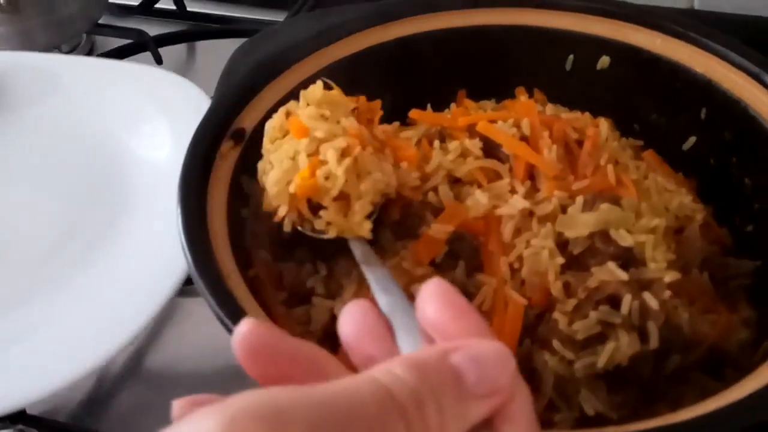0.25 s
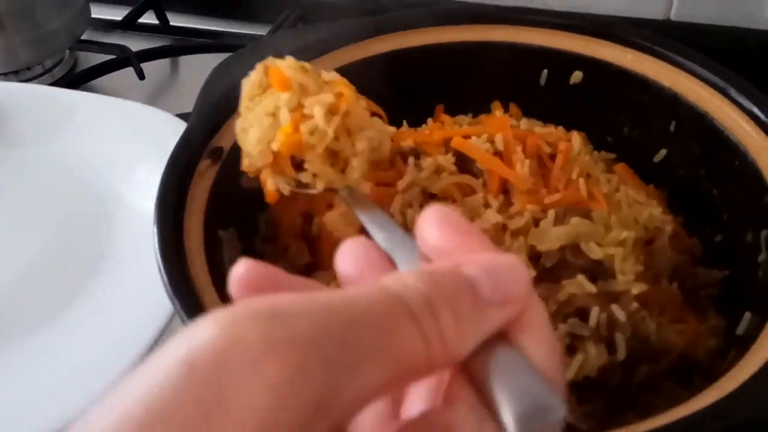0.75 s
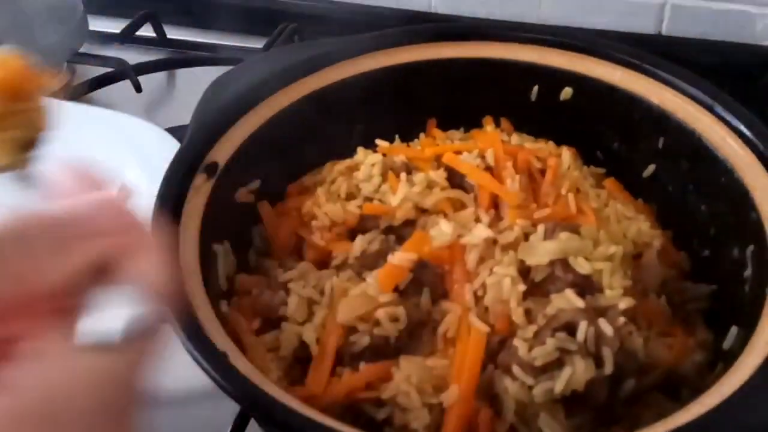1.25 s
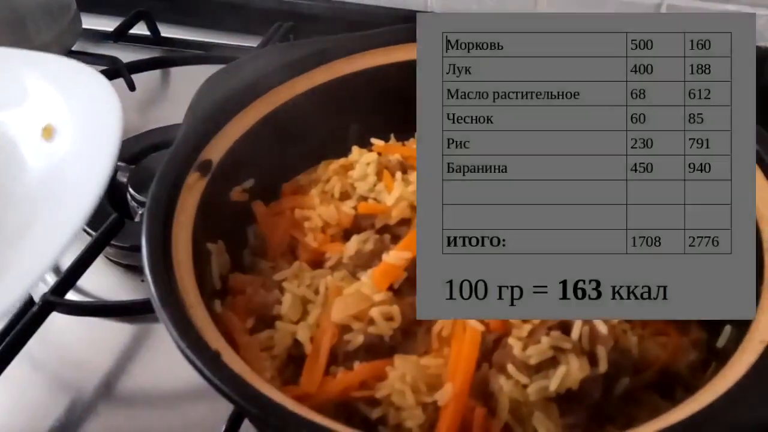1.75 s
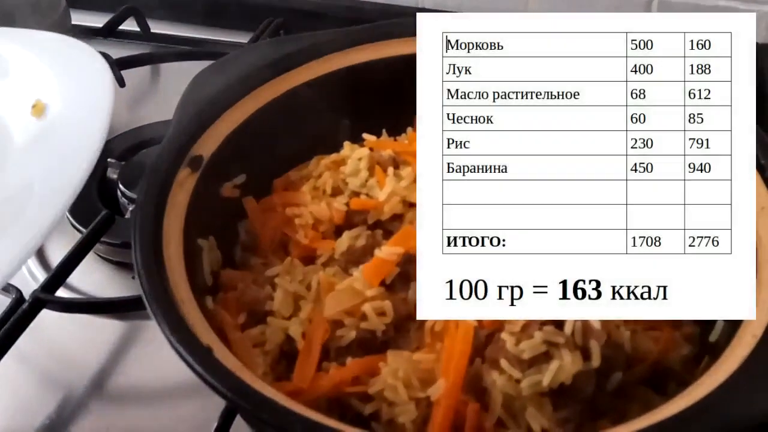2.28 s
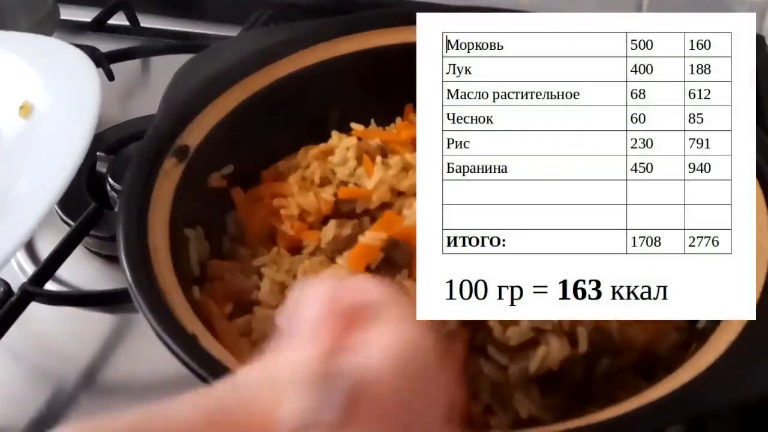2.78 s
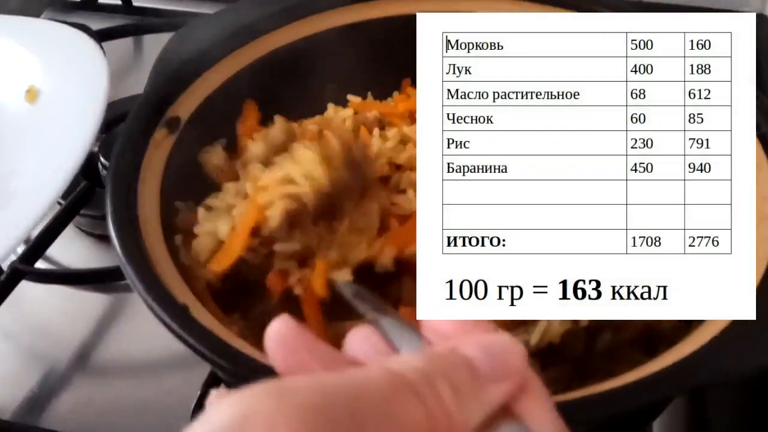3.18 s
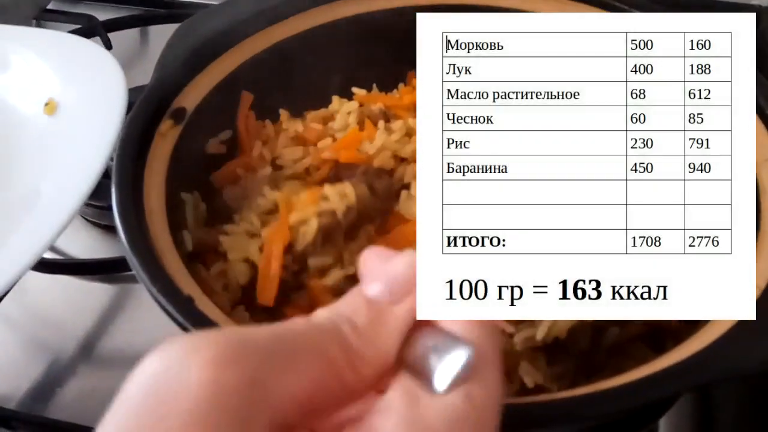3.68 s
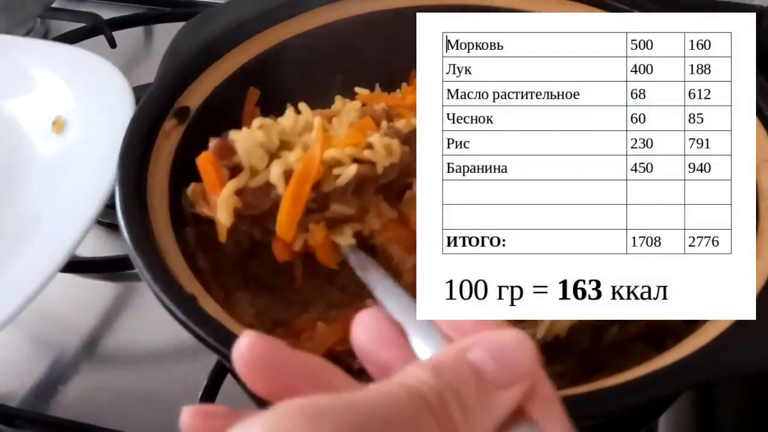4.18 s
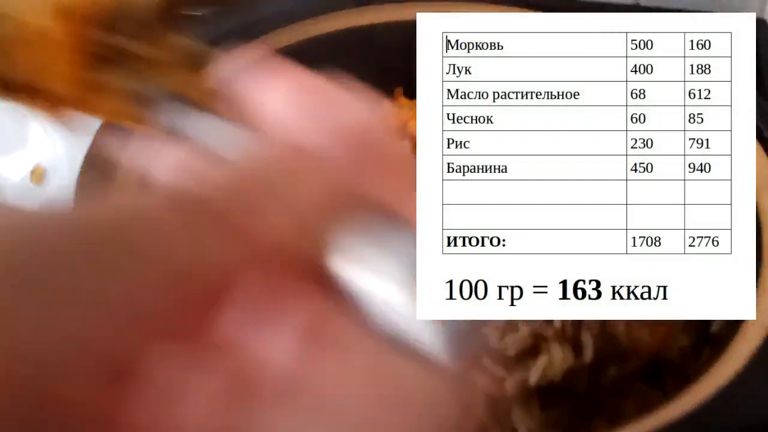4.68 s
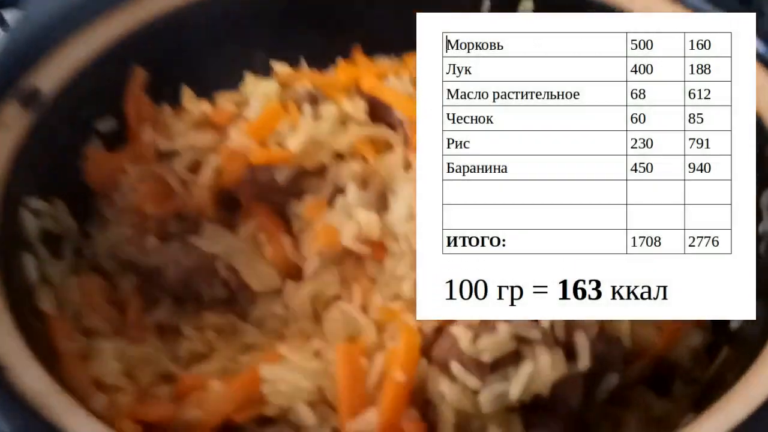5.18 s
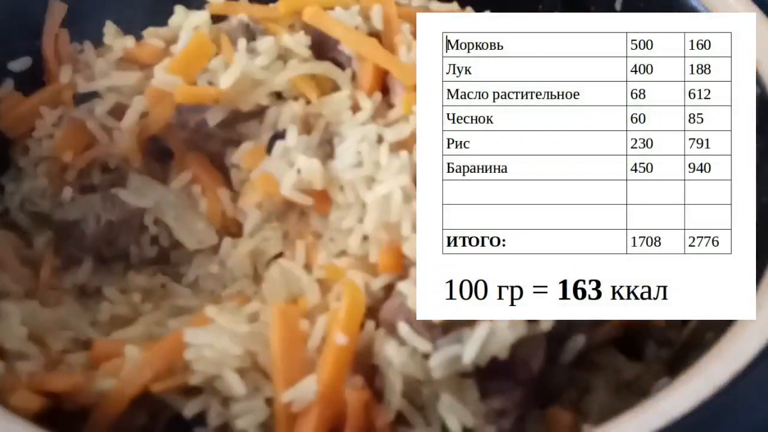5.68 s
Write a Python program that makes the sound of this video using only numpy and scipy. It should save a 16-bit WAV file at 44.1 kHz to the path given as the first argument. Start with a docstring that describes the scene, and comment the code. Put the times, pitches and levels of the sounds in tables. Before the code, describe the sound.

A metal spoon knocks a glazed ceramic pot three times, with rice scrapes, tiny ticks and a faint wall clock in a small kitchen.

```python
"""A small hard-walled kitchen: close by, a metal spoon serves rice from a glazed ceramic pot.
Three knocks ring the pot as a bank of decaying modes; the stove top under it swells in low modes.
Between them, clumps of tiny clicks make scrapes, noise puffs make ticks, and resonators squeak and ring a plate.
Further off a wall clock rattles its case about once a second, over shaped noise for room hiss, drones and hum.
The microphone hears the room's reverberation too; both channels are nearly alike."""
import sys
import numpy as np
from scipy import signal
from scipy.fft import rfft, irfft
from scipy.io import wavfile

SR = 44100
rng = np.random.default_rng(int(sys.argv[2]) if len(sys.argv) > 2 else 0)


def log_audio(samples):
    """Write samples as a 16-bit WAV file to the path given in sys.argv[1]."""
    # one column per channel
    frames = np.atleast_2d(samples).T
    # limit to full scale, then quantise
    limited = np.clip(frames, -1, 1)
    pcm = np.round(limited * 32767).astype(np.int16)
    wavfile.write(sys.argv[1], SR, pcm)


N = 261954   # length in samples

# The pot's modes. Each entry: frequency in Hz.
POT_MODE_HZ = [495, 587, 624, 684, 822, 915, 1055, 1152, 1281, 1346, 1597, 1698, 1815, 1866, 1943, 1986,
               2480, 2965, 3080, 3149, 3935, 4390, 4640, 4805, 5110, 5510, 6480, 7900, 8480, 9690]
# How those modes answer. Each row: t60 in s, then strength in dB when struck at the first, second and third spot.
POT_SPOTS = [(0.15, -26, -43.5, -26.5), (0.28, -25, -34, -22.5), (0.45, -18, -31.5, -27),
             (0.11, -17, -30, -27.5), (0.2, -27, -29, -29.5), (0.2, -25.5, -32, -39),
             (0.199, -30.5, -28.5, -28.5), (0.17, -29, -39.5, -26.5), (0.2, -37, -47.5, -26.5),
             (0.2, -28.5, -52.5, -32.5), (0.25, -11, -17.5, -12), (0.29, -30.5, -16.5, -17),
             (0.2, -31.5, -32, -20.5), (0.2, -22.5, -20.5, -17), (0.13, -26.5, -29.5, -22.5),
             (0.17, -30, -38, -19.5), (0.2, -42.5, -35.5, -34), (0.15, -23.5, -22, -17.5),
             (0.2, -31.5, -19.5, -44), (0.22, -19.5, -20, -15.5), (0.14, -40, -28, -30),
             (0.19, -45.5, -31, -49), (0.13, -37.5, -24, -47), (0.12, -31.5, -25.5, -24.5),
             (0.12, -39, -39.5, -35), (0.089, -30.5, -20, -33), (0.092, -27.5, -24.5, -30),
             (0.13, -54, -39.5, -64), (0.14, -51.5, -39, -81), (0.14, -53, -30, -46.5)]
# Noisy crack of each knock, one per spot. Each row: start in s, peak in dB, centre in Hz, width in octaves, t60 in s.
KNOCK_CRACKS = [(0.5412, -4, 1123, 3, 0.051), (3.43, -1.5, 2516, 3.86, 0.042),
                (5.465, -7, 1370, 2.8, 0.035)]
# Rice shaken against the glaze by a knock. Each row: start in s, peak in dB, centre in Hz, width in octaves, t60 in s.
RICE_SHAKES = [(.543, -32, 5200, 0.94, .15), (3.432, -9, 3500, 1.8, .3), (3.432, -22.5, 9500, 1., 0.29),
               (3.432, -29.5, 15000, .25, .14), (5.467, -34.5, 4550, .9, .12)]
# Spoon chattering on the wall after each knock. Each row: level at the knock in dB, loss in dB per s.
SPOON_CHATTER = [(-20, 200), (-21, 120), (-30, 249.5)]
# Spoon sliding on the wall struck before. Each row: time of full level in s, length held in s, level in dB.
WALL_SLIDES = [(.77, 0.093, -45), (0.988, 0.094, -63.5), (5.68, 0.044, -55.5), (5.791, 0.032, -67.5)]
ATTACK_DB_PER_S, RELEASE_DB_PER_S = 394, 253.5   # how a slide or stroke swells and fades

# Sheet-metal stove top. Each row: frequency in Hz, t60 in s, relative level in dB.
STOVE_MODES = [(129.85, 0.43, -6), (225.5, .27, 0.4), (281, 0.5, -1.5), (336, 0.52, -0.2)]
# Pushes on the stove top. Each row: start in s, level in dB of the modes under 250 Hz, level in dB of those above.
STOVE_PUSHES = [(.545, -35.5, -34.5), (.79, -50, -41.5), (3.125, -42.5, -57.5), (3.15, -44, -55),
                (3.441, -27, -34), (3.839, -34.5, -49), (5.47, -28, -54)]
# Dull noise of each push; its level is relative to the push's low modes.
THUD_DB, THUD_HZ, THUD_OCTAVES, THUD_T60_S = -7.5, 100.64, 1.2, 0.23
# The pot rocking on its grate. Each row: start in s, peak in dB.
POT_ROCKS = [(3.123, -38.5), (3.832, -32.5)]
ROCK_HZ, ROCK_OCTAVES, ROCK_T60_S = 670, 0.93, 0.12

# Strokes through the rice. Each row: time of full level in s, length held in s, rasp in dB, fine sizzle in dB.
RICE_STROKES = [(2.92, 0.07, -53.5, -59), (3.042, 0.029, -51, -58.5), (3.148, 0.069, -58, -68),
                (3.22, 0.047, -72, -57), (3.3, 0.14, -80, -69), (3.735, 0.067, -54, -56),
                (3.81, 0.016, -65, -62), (3.924, 0.041, -65, -71), (5.23, 0.029, -74, -66)]
# Colour of the rasp. Each row: frequency in Hz, relative density in dB per Hz.
RASP_SPECTRUM = [(710, -65.5), (1200, -15.5), (2090, -19), (2280, -4), (2870, -11.5), (5780, -10),
                 (8000, -35.5), (10400, -58), (17600, -120)]
# Colour of the fine sizzle. Each row: frequency in Hz, relative density in dB per Hz.
SIZZLE_SPECTRUM = [(7500, -33), (9000, -12.5), (10800, 4.5), (12500, -7), (13700, -20), (15200, 0.5),
                   (16400, -9.5)]

# Bright ticks of grains and spoon edge. Each row: start in s, peak in dB, centre in Hz.
BRIGHT_TICKS = [(0.1042, -45, 15300), (0.2295, -44, 15100), (0.7786, -37, 12700), (1.4568, -49, 15200),
                (1.735, -45.5, 11700), (2.2835, -48, 15400), (2.7696, -41, 10700), (2.8991, -37, 9150),
                (3.0415, -38, 11100), (3.1509, -43.5, 11400), (3.2177, -51, 10700), (3.268, -37, 15500),
                (3.3054, -38, 15260), (3.356, -41, 15200), (3.806, -34, 15400), (3.8718, -31, 14800),
                (4.045, -36, 14900), (4.4436, -51, 14960), (5.2178, -49.5, 10830), (5.2541, -49.5, 9810),
                (5.3981, -53, 9920), (5.4234, -51, 15400)]
TICK_OCTAVES, TICK_T60_S = 0.2, 0.031
# Duller contacts with the pot wall. Each row: start in s, peak in dB, centre in Hz, width in octaves.
WALL_TOUCHES = [(.306, -49.5, 1932, 0.92), (2.77, -44, 5530, .69), (2.902, -24, 5300, 2.74),
                (2.917, -30.5, 3334, 1.36), (3.167, -30.5, 3600, 0.61), (3.218, -36.5, 4810, 0.98),
                (3.412, -39, 6900, .29), (3.731, -24, 3220, 1.66), (3.916, -45, 3460, 1.44),
                (5.319, -51, 1700, 0.97)]
TOUCH_T60_S = 0.029

# Spoon edge squeaking on glaze. Each row: start in s, level in dB before a fixed cut, frequency in Hz, t60 in s.
GLAZE_SQUEAKS = [(1.6713, -46, 1772, 0.077), (1.7218, -45, 1760, 0.093), (1.7435, -42.5, 1808, 0.053),
                 (1.776, -41, 1810, 0.056)]
# The tap on the plate. One row: start in s, level in dB before a fixed cut.
PLATE_TAP_EVENT = [(1.794, -33)]
# The plate's modes. Each row: frequency in Hz, relative level in dB, t60 in s.
PLATE_MODES = [(1800, -6, 0.029), (2064, -3.5, 0.032), (2820, -12, .05), (3018, -5, 0.16),
               (2985, 2.5, 0.047), (3230, -6, 0.075), (5460, -8, 0.024), (5640, -13, 0.057),
               (8600, -30, 0.028), (9600, 1, 0.032), (10270, 7, 0.038), (13700, -20, .025)]

# Wall clock ticks, before the loss with distance. Each row: start in s, peak of the rattle in dB.
CLOCK_TICKS = [(0.058, -46), (1.05, -40), (2.055, -41.5), (3.046, -43), (4.073, -49), (5.046, -41.5)]
# The clock case's modes. Each row: frequency in Hz, damping in Hz (t60 in s is 0.73 over it), relative level in dB.
CLOCK_CASE_MODES = [(956, 20, -0.5), (1280, 11, -11.5), (1478, 47, -2.5), (1830, 53, -4.5), (2330, 56, 1.5),
                    (2680, 44, -3.5), (3240, 27, -7), (4230, 97, -3.5)]

# Colour of the steady room noise. Each row: frequency in Hz, relative density in dB per Hz.
AIR_SPECTRUM = [(18, -50), (30, -27.5), (128, -3.5), (167, -15.5), (201, -10), (298, -9), (409, -16),
                (547, -10.5), (835, -15.5), (1620, -22), (1840, -22.5), (4290, -23.5), (13400, -36),
                (15200, -23.5), (16500, -38)]
AIR_DB = -60.5
# Steady appliance tones. Each row: frequency in Hz, width in Hz, level in dB.
APPLIANCE_DRONES = [(200, 23, -74), (335.6, 37, -67.5), (539, 3, -72)]
# A low hum that wavers. Each row: time in s, level in dB.
HUM_LEVEL = [(0.0, -79.5), (0.58, -69.5), (0.76, -58.5), (1.3, -62.5), (1.74, -67), (2.03, -55.5),
             (2.2, -61), (2.84, -77), (3.03, -60), (3.3, -54.5), (3.49, -63.5), (3.79, -92), (3.99, -65),
             (4.43, -70), (5.03, -70.5), (5.64, -77), (5.94, -61)]
HUM_HZ, HUM_WIDTH_HZ = 136, 20

# The kitchen's reverberation time. Each row: frequency in Hz, t60 in s.
KITCHEN_T60 = [(100, 0.92), (260, .75), (700, 0.57), (1800, 0.48), (5000, 0.41), (9000, 0.3), (14000, 0.31)]
ROOM_DB = -9          # near sounds sent to the reverberation
CUTOFF_HZ = 16650     # top of the recorded band


def pot(spread=0.023, neighbour_db=-9, flutter_db=4.5):
    """Each knock strikes every mode as strongly as its spot allows; the slide after it rubs the same modes."""
    times = np.array(KNOCK_CRACKS)[:, 0]
    count = len(POT_MODE_HZ)
    slides = rng.standard_normal(N) * rubbing()
    # the blow takes a moment to spread round the wall
    lags = rng.uniform(0, .003, (count, len(times)))
    offsets = rng.uniform(0.11, 1, (count, 2)) * [-spread, spread]
    # loose rice and the spoon touch the wall unevenly
    loads = flutter(rate_hz=45, count=count)
    ringing = 0
    for hz, (t60, *spots_db), lag, offset, load in zip(POT_MODE_HZ, POT_SPOTS, lags, offsets, loads):
        # friction feeds weak modes more evenly than a blow does
        friction = amp(0.78 * np.array(spots_db) - 17.0) @ slides
        drive = clicks(times + lag, spots_db) + friction
        # the uneven wall gives every mode two weaker neighbours that die sooner
        neighbours = sum(ring(drive, hz * (1 + o), 0.83 * t60) for o in offset)
        mode = ring(drive, hz, t60) + amp(neighbour_db) * neighbours
        ringing = ringing + amp(flutter_db * load) * mode
    # the ringing is kept between 330 Hz and 8 kHz
    ringing = butter(2, [330, 8000], "band", ringing)
    return ringing + bursts(KNOCK_CRACKS, rise=0.036) + bursts(RICE_SHAKES, rise=0.0064)


def rubbing():
    """Gain of the friction at each struck spot: chatter after the knock, then the slides that follow it."""
    times, t = np.array(KNOCK_CRACKS)[:, 0], np.arange(N) / SR
    gains = np.array([(t > s) * amp(level_db - loss_db * np.abs(t - s))
                      for s, (level_db, loss_db) in zip(times, SPOON_CHATTER)])
    for s, length, level_db in WALL_SLIDES:
        last_spot = np.searchsorted(times, s) - 1
        gains[last_spot] += stroke(s, length, level_db)
    return gains


def stove(swell_s=0.068):
    """A soft push makes each low mode swell, then die, over a dull thud; the rocking pot adds noise puffs."""
    times, low_db, high_db = np.transpose(STOVE_PUSHES)
    thuds = bursts([(s, db + THUD_DB, THUD_HZ, THUD_OCTAVES, THUD_T60_S) for s, db in zip(times, low_db)], rise=.12)
    rocks = bursts([(s, db, ROCK_HZ, ROCK_OCTAVES, ROCK_T60_S) for s, db in POT_ROCKS], rise=0.1)
    out = thuds + rocks
    for hz, t60, level_db in STOVE_MODES:
        # two resonances in a row swell before they die; scale one push to peak 1
        unit = np.abs(ring(ring(clicks([0], 0)[:SR], hz, t60), hz, swell_s)).max()
        peaks_db = level_db + (low_db if hz < 250 else high_db)
        out = out + ring(ring(clicks(times, peaks_db), hz, t60), hz, swell_s) / unit
    return out


def scrape(per_s):
    """Uneven micro-contacts of rice and steel, coming in clumps."""
    clumps = amp(10 * np.array(flutter(rate_hz=23, count=2)))
    born = rng.random((2, N)) < per_s * clumps / SR
    sizes = amp(2.9 * rng.exponential(1, (2, N)))
    grains = born * sizes * rng.choice([-1, 1], (2, N))
    rasp = coloured(RASP_SPECTRUM, grains[0])
    sizzle = coloured(SIZZLE_SPECTRUM, grains[1])
    return sum(stroke(s, length, rasp_db) * rasp + stroke(s, length, sizzle_db) * sizzle
               for s, length, rasp_db, sizzle_db in RICE_STROKES)


def contacts():
    """Short ticks and touches of the spoon, each a dying puff of band noise."""
    ticks = bursts([(*row, TICK_OCTAVES, TICK_T60_S) for row in BRIGHT_TICKS])
    touches = bursts([(*row, TOUCH_T60_S) for row in WALL_TOUCHES])
    return ticks + touches


def plate_and_squeaks():
    """A light noisy contact rings the plate's modes; squeaks of the spoon on glaze are short tones."""
    (s, tap_db), = PLATE_TAP_EVENT
    contact = bursts([(s, tap_db - 24, 3200, 2.8, .04)], rise=0.16)
    tap = sum(amp(level_db) * ring(contact, hz, t60) for hz, level_db, t60 in PLATE_MODES)
    # each squeak swells over a few milliseconds: a tone through its own resonance
    squeaks = sum(ring(ring(clicks([s], level_db - 32), hz, t60), hz, 0.013)
                  for s, level_db, hz, t60 in GLAZE_SQUEAKS)
    return tap + squeaks


def clock():
    """The stepping works rattle the case for a few hundredths of a second, and its modes ring."""
    rattle = bursts([(s, level_db, 2400, 2.3, .12) for s, level_db in CLOCK_TICKS], rise=0.034)
    case = sum(amp(level_db - 24) * ring(rattle, hz, 0.73 / damping_hz)
               for hz, damping_hz, level_db in CLOCK_CASE_MODES)
    return rattle + case


def air():
    """Steady room noise is shaped noise; appliance tones and the wavering hum are narrow resonances of noise."""
    hiss = amp(AIR_DB) * coloured(AIR_SPECTRUM, rng.standard_normal(N))
    drones = sum(amp(level_db) * tone(hz, width_hz) for hz, width_hz, level_db in APPLIANCE_DRONES)
    hum = gain_curve(HUM_LEVEL) * tone(HUM_HZ, HUM_WIDTH_HZ)
    return hiss + drones + hum


def room(x):
    """Reverberation: noise that builds up, slowly in the bass, and dies at its own rate in each half octave."""
    t, tail = np.arange(SR) / SR, 0
    white = rng.standard_normal((2, SR))
    for k, low in enumerate(40 * 2 ** np.arange(0, 9, .5)):
        band = butter(2, [low, low * np.sqrt(2)], "band", white[k % 2])
        build_up = 1 - np.exp(-t / (0.0023 + 4. / low))
        tail = tail + band * build_up * amp(-60 * t / at_hz(KITCHEN_T60, low))
    return signal.fftconvolve(x, tail / np.sqrt(np.sum(tail ** 2)))[:N]


def amp(db):
    """dB to gain."""
    return 10 ** (np.asarray(db) / 20)


def rms_one(x):
    """Scale to rms 1."""
    return x / np.sqrt(np.mean(x ** 2) + 1e-20)


def butter(order, hz, kind, x):
    """Butterworth filter of this order and kind."""
    return signal.sosfilt(signal.butter(order, hz, kind, fs=SR, output="sos"), x)


def gain_curve(rows):
    """A dB curve as gain in time."""
    s, level_db = np.transpose(rows)
    return amp(np.interp(np.arange(N) / SR, s, level_db))


def at_hz(points, hz):
    """Read a spectrum on a log-frequency axis."""
    points_hz, values = np.transpose(points)
    return np.interp(np.log(hz), np.log(points_hz), values)


def coloured(spectrum, source):
    """Give a flat source this spectrum; rms 1."""
    hz = np.maximum(np.arange(N // 2 + 1) * SR / N, 1)
    return rms_one(irfft(rfft(source) * amp(at_hz(spectrum, hz)), N))


def ring(drive, hz, t60):
    """Two-pole resonance: a unit click sets a decaying sine of height 1 ringing."""
    r, w = amp(-60 / (t60 * SR)), 2 * np.pi * hz / SR
    return signal.lfilter([0, np.sin(w)], [1, -2 * r * np.cos(w), r * r], drive + 1e-18)


def tone(hz, width_hz):
    """Noise in one narrow resonance; rms 1."""
    t60 = np.log(1000) / np.pi / width_hz
    return rms_one(ring(rng.standard_normal(N), hz, t60))


def clicks(times, level_db):
    """Single clicks at these moments."""
    out = np.zeros(N)
    out[np.round(np.asarray(times) * SR).astype(int)] = amp(level_db)
    return out


def bursts(rows, rise=0.0056):
    """Each row is a dying puff of noise in one band; it swells over this share of its t60."""
    out, white = np.zeros(N), rng.standard_normal(N + SR)
    for s, level_db, hz, octaves, t60 in rows:
        at, t = round(s * SR), np.arange(int(t60 * SR)) / SR
        edges = hz * 2 ** (np.array([-.5, .5]) * octaves)
        edges = np.clip(edges, 20, .45 * SR - np.array([500, 0]))
        shape = (1 - np.exp(-t / (rise * t60))) * amp(-60 * t / t60)
        puff = butter(3, edges, "band", white[at:at + len(t)] * shape)
        out[at:at + len(t)] += (amp(level_db) * puff / np.abs(puff).max())[:N - at]
    return out


def stroke(s, length, level_db):
    """Gain that swells up to s, holds and fades."""
    t = np.arange(N) / SR - s
    swell_db = ATTACK_DB_PER_S * np.minimum(t, 0)
    fade_db = RELEASE_DB_PER_S * np.maximum(t - length, 0)
    return amp(level_db + swell_db - fade_db)


def flutter(rate_hz, count):
    """Rows of slow chance: random steps of spread 1, joined by straight lines."""
    steps = rng.standard_normal((count, int(N / SR * rate_hz) + 2))
    return [np.interp(np.arange(N) / SR * rate_hz, np.arange(len(row)), row) for row in steps]


def scene():
    """Near sounds arrive direct and reflected, the clock mostly reflected."""
    near = pot() + stove() + scrape(per_s=2000.0) + contacts()
    plate, far = plate_and_squeaks(), clock()
    direct = near + plate + amp(-8.0) * far
    reflected = room(amp(ROOM_DB) * near + amp(-12) * plate + amp(-1.5) * far)
    mono = direct + reflected + air()
    return np.array([mono, mono])


def record(dry):
    """Peaks are rounded, the deep bass is lost, the channels differ a little in the treble only, the top is cut."""
    rounded = 0.91 * np.tanh(dry[0] / 0.92)
    mid = butter(1, 30, "high", rounded)
    smear = rng.standard_normal(1500) * np.exp(-np.arange(1500) / 500)
    side = butter(8, 6000, "high", signal.fftconvolve(mid, smear)[:N])
    both = mid + amp(-33.5) * side * [[1], [-1]]
    return signal.sosfilt(signal.cheby2(12, 60, CUTOFF_HZ, fs=SR, output="sos"), both)


dry = scene()
out = record(dry)
log_audio(out)
```